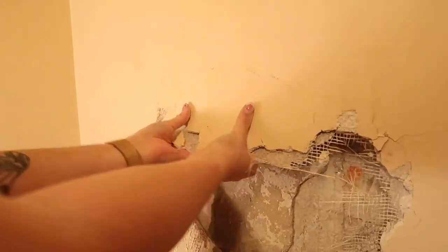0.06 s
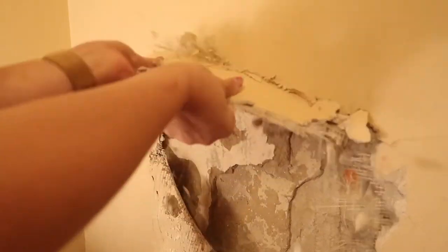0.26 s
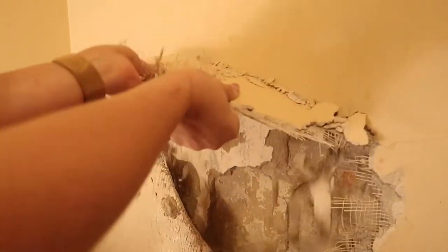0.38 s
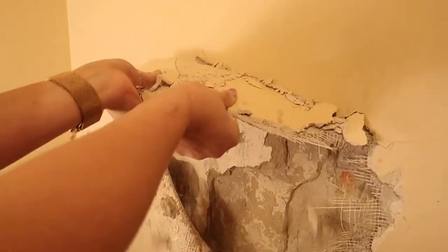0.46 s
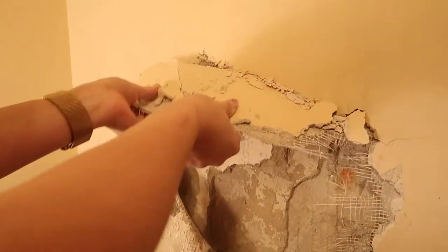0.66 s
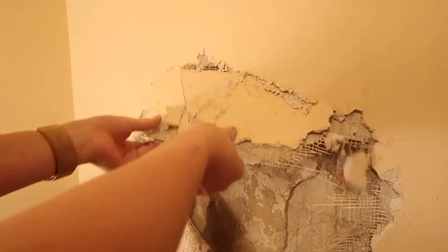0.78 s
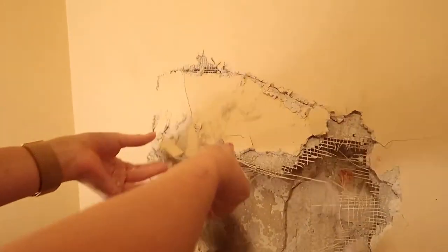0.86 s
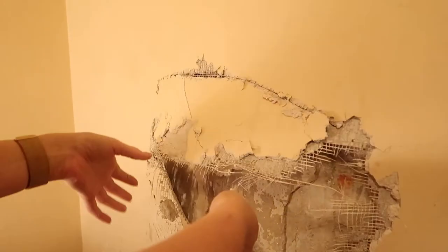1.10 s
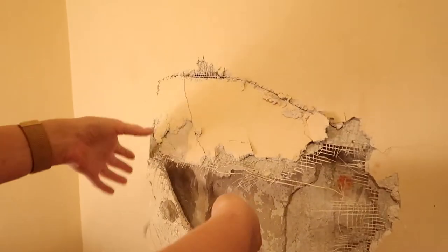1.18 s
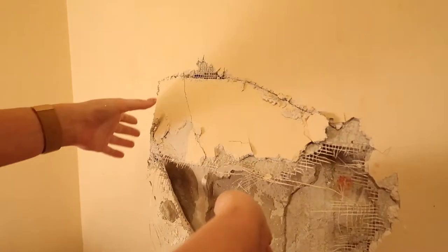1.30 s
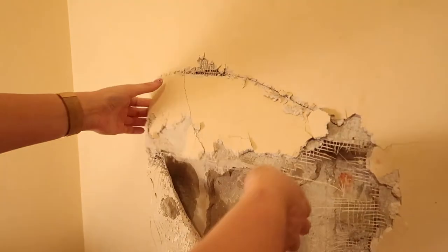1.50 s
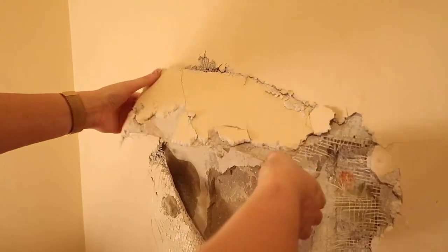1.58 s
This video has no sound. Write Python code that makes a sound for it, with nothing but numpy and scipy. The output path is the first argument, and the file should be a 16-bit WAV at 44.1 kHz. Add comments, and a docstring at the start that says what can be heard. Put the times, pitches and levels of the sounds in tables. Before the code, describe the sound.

A plaster slab tears from a wall with a sudden, crunching crackle. Afterwards grit runs down, small chips tick and larger pieces knock against wall and floor, with short echoes in a small, bare room.

```python
"""Faint grit and a soft bump, then a quick run of snaps: hands prise a slab of plaster off a wall.
The slab tears in many tiny cracks, and each big snap makes it ring briefly. Then grit runs down
the wall, crumbs patter, chips tick and chunks knock on the floor. The room is small and bare,
so the nearby walls answer each chip and chunk."""
import sys
import numpy as np
from scipy import signal
from scipy.io import wavfile
from scipy.ndimage import uniform_filter1d

SR = 44100
rng = np.random.default_rng(int(sys.argv[2]) if len(sys.argv) > 2 else 0)


def output_pcm(signal):
    """Save a mono or channel-first signal as 16-bit PCM at the path in sys.argv[1].

    Samples are clipped to [-1, 1] before scaling.
    """
    pcm = np.clip(np.atleast_2d(signal).T, -1, 1) * 32767
    wavfile.write(sys.argv[1], SR, np.round(pcm).astype(np.int16))


N = 72765
T = np.arange(N) / SR


def amp(db):
    """Turns decibels into a number to multiply by."""
    return 10 ** (np.asarray(db) / 20)


def unit(x):
    """Scales a sound to an average strength (rms) of 1."""
    return x / np.sqrt(np.mean(x ** 2) + 1e-20)


def read(points, hz):
    """Looks up frequencies in a table, blending between rows on a pitch scale."""
    row_hz, value = np.transpose(points)
    return np.interp(np.log(hz + 1), np.log(row_hz + 1), value)


def level(points):
    """Draws a volume curve through (time [s], level [dB]) points."""
    return amp(np.interp(T, *np.transpose(points)))


def add(mix, start_s, sound):
    """Mixes a sound in at the given time."""
    part = mix[max(round(start_s * SR), 0):][:len(sound)]
    part += sound[:len(part)]


def colour(x, points, keep_power=True, size=4096):
    """Shapes bass and treble from a table; keep_power leaves plain noise as strong as it was."""
    log_gain = np.log(amp(read(points, abs(np.fft.fftfreq(size, 1 / SR)))))
    spectrum = np.exp(np.conj(signal.hilbert(log_gain)))  # nothing sounds ahead of a click
    taps = np.fft.ifft(spectrum).real[:size // 2]
    return signal.fftconvolve(x, taps / (np.linalg.norm(taps) if keep_power else 1))[:len(x)]


def clicks(per_s, spread_db):
    """Random clicks: a few stand out if spread_db is positive, a few are weaker if it is negative."""
    strength = amp(spread_db * np.minimum(rng.exponential(1, N), 4))
    return unit(strength * rng.choice([-1., 1.], N) * (rng.random(N) < per_s / SR))


def burst(t, fall_s, rise_s=.001):
    """A volume curve that jumps up to 1 and dies away."""
    shape = (1 - np.exp(-(t / rise_s) ** 2)) * np.exp(-t / fall_s)
    return shape / shape.max()


def ringing(tones):
    """Tones that start together and die away."""
    t = T[:SR // 2]
    return sum(amp(db - 60 * t / fade_s) * np.sin(2 * np.pi * hz * t) for hz, db, fade_s in tones)


# tone of the quiet room (frequency [Hz], relative level [dB])
HUSH_COLOUR = [(20, -11.5), (145, 2), (220, -2.5), (900, -11), (15000, -44)]
def hush(level_db=-53):
    """The faint, steady background of the room."""
    return amp(level_db) * unit(colour(rng.standard_normal(N), HUSH_COLOUR))


# how long the room rings (frequency [Hz], time to fade by 60 dB [s])
ROOM_FADE = [(150, 0.1), (2000, 0.38), (14000, 0.25)]
def room(x, echoes=(), tail_db=-10.5, build_s=.0076):
    """Sound arrives directly, then as any given echoes and a short blur of bounces off the walls."""
    hz, t, noise = signal.stft(rng.standard_normal(SR // 2), SR, nperseg=256)
    fade = amp(-60 * t / read(ROOM_FADE, hz)[:, None])
    tail = signal.istft(noise * fade, SR, nperseg=256)[1]
    tail *= np.minimum(T[:len(tail)] / build_s, 1)
    response = amp(tail_db) * tail / np.linalg.norm(tail)
    response[0] += 1  # the direct sound
    for delay_s, db in echoes:
        add(response, delay_s, amp([db]))
    return signal.fftconvolve(x, response)[:N]


# tone of plaster dust (frequency [Hz], relative level [dB])
DUST_COLOUR = [(1200, -5), (4500, 0.5), (11000, -16), (15500, -26)]
def dust(noise):
    """Gives noise the bright hiss of fine dust."""
    return colour(noise, DUST_COLOUR)


def tick(hz, fall_s, wobble=.65, dust_db=-12.5, size=1000):
    """A small hard piece lands: one short, unsteady ring with a gritty edge."""
    turns = np.cumsum(hz * (1 + wobble * rng.standard_normal(size))) / SR
    ring = np.sin(2 * np.pi * (turns + rng.random()))
    edge = amp(dust_db) * dust(rng.standard_normal(size))
    return np.exp(-T[:size] / fall_s) * (ring + edge)


# flow of grit down the wall (time [s], level [dB])
GRIT_FLOW = [(0, -56.5), (.075, -54), (.11, -66.5), (.42, -55.5), (.6, -47.5), (.618, -36.5), (.69, -43),
             (.72, -42.5), (.98, -46.5), (1.13, -55.5), (1.28, -45.5), (1.42, -41.5), (1.57, -46.5),
             (1.62, -56)]
# tone of the grit (frequency [Hz], relative level [dB])
GRIT_COLOUR = [(200, -18.5), (700, -1.5), (4500, -1), (8000, -8.5), (12500, -13.5), (15500, -56)]
def grit(clump_s=.014, clump_db=2.5):
    """Tiny grains click down the wall in uneven clumps."""
    grains = clicks(per_s=2200, spread_db=-4.5)
    wander = unit(uniform_filter1d(rng.standard_normal(N), round(clump_s * SR)))
    clumps = unit(amp(clump_db * wander))
    return colour(grains * level(GRIT_FLOW) * clumps, GRIT_COLOUR)


def flakes(per_s=220, low_hz=1590, high_hz=6320, pitches=24, against_grit_db=-7):
    """Small flakes tick, each at its own pitch, coming and going with the flow of grit."""
    ticks = np.zeros(N)
    for hz in np.geomspace(low_hz, high_hz, pitches):
        landings = clicks(per_s / pitches, spread_db=2.5)
        ticks += signal.fftconvolve(landings, tick(hz, fall_s=.001))[:N]
    return amp(against_grit_db) * level(GRIT_FLOW) * unit(ticks)


# flow of crumbs onto the floor (time [s], level [dB])
CRUMB_FLOW = [(0, -49), (.15, -57.5), (.58, -46), (.72, -37.5), (.95, -37.5), (1.21, -48), (1.52, -45.5),
              (1.65, -64)]
# tone of the crumbs (frequency [Hz], relative level [dB])
CRUMB_COLOUR = [(100, -20.5), (400, -0.5), (750, -2), (1700, -14.5), (12000, -56)]
def crumbs():
    """Crumbs land on the floor in a dull patter."""
    return colour(clicks(per_s=1100, spread_db=2.5) * level(CRUMB_FLOW), CRUMB_COLOUR)


# chips landing (time [s], pitch [Hz], level [dB])
CHIP_LANDINGS = [(0.865, 3480, -32.5), (.9658, 4930, -35.5), (1.1782, 5600, -35.5), (1.2213, 4325, -28.5),
                 (1.377, 2080, -21), (1.4558, 3720, -26)]
def chips():
    """Hard chips hit the floor with one tick each."""
    ticks = np.zeros(N)
    for start_s, hz, db in CHIP_LANDINGS:
        add(ticks, start_s, amp(db) * tick(hz, fall_s=.0038))
    return ticks


# tone of crunching plaster edges (frequency [Hz], relative level [dB])
CRUNCH_COLOUR = [(170, -33), (450, 7.5), (900, 9.5), (3200, -4.5), (6000, -32.5)]
def blows(rows, thud_rise_s=.0009, thud_cycles=2.3, size=3000):
    """Each snap or knock is a short dead thud, a crunch of the edges and a spit of dust."""
    t = T[:size]
    thuds, crunches, spits = np.zeros((3, N))
    for start_s, hz, thud_db, crunch_db, dust_db in rows:
        crunch_noise, dust_noise = rng.standard_normal((2, size))
        swell = (1 - np.exp(-(t / thud_rise_s) ** 2)) * np.exp(-(hz * t / thud_cycles) ** 2)
        thud = np.gradient(-swell * np.cos(2 * np.pi * hz * t), t) / (2 * np.pi * hz)
        add(thuds, start_s, amp(thud_db) * thud)
        add(crunches, start_s, amp(crunch_db) * burst(t, fall_s=.0047) * crunch_noise)
        add(spits, start_s, amp(dust_db) * burst(t, fall_s=.0069) * dust_noise)
    return thuds + colour(crunches, CRUNCH_COLOUR) + dust(spits)


# a faint low handling bump near the start, and chunks hitting wall and floor
# (time [s], pitch [Hz], thud [dB], crunch [dB], dust [dB])
KNOCKS = [(.028, 860, -41, -40, -65), (.085, 97, -48, -65, -67), (.117, 734, -34.5, -70, -60),
          (.512, 1060, -23, -35.5, -45.5), (.556, 718, -32, -40, -52), (.574, 372, -33, -38.5, -62),
          (.699, 240, -36.5, -43, -43.5), (.738, 692, -9.5, -25.5, -36), (.836, 615, -23, -27.5, -33),
          (.865, 670, -25, -28.5, -45), (.881, 670, -23.5, -35, -60), (.8957, 440, -26.5, -21.5, -42),
          (.8983, 674, -10.5, -30.5, -44), (1.062, 389, -23, -31.5, -55), (1.1435, 346, -27, -28.5, -39),
          (1.2202, 480, -53, -33.5, -40), (1.2415, 525, -13.5, -32, -37.5), (1.251, 538, -14.5, -26, -37),
          (1.2518, 940, -19.5, -26, -35), (1.274, 744, -22, -31, -41), (1.327, 630, -41, -36, -39),
          (1.3765, 533, -14, -27, -40), (1.401, 570, -24.5, -30, -33.5), (1.4555, 526, -25, -27, -27.5),
          (1.551, 815, -27, -37.5, -40)]
# low tones of the small room (pitch [Hz], relative level [dB], time to fade by 60 dB [s])
ROOM_TONES = [(416, -3.5, 0.2), (519.3, -3.5, 0.15), (846, 1.5, .22)]
def knocks(ring_db=-26):
    """A faint handling bump and the knocks of loose chunks; the room rings briefly after each."""
    hits = blows(KNOCKS)
    ring = ringing(ROOM_TONES)
    return hits + amp(ring_db) * signal.fftconvolve(hits, ring / np.linalg.norm(ring))[:N]


# echoes off the nearby walls (delay [s], level against the direct sound [dB])
WALL_ECHOES = [(.0100, -9), (0.02, -17.5)]
def debris():
    """The falling plaster, heard in the room; only knocks and chips get separate echoes."""
    return room(grit() + crumbs() + flakes()) + room(knocks() + chips(), WALL_ECHOES)


# strength of the tearing (time [s], level [dB])
TEAR_LEVEL = [(.198, -60), (.214, -43), (.223, -20.5), (.232, -15.5), (.242, -23), (.256, -19),
              (.277, -19.5), (.308, -23), (.336, -28.5), (.385, -46)]
# tone of the tearing (frequency [Hz], relative level [dB])
TEAR_COLOUR = [(30, -51), (90, -5), (155, -21), (280, -7.5), (480, 1), (620, -2.5), (1400, -11), (1700, -8),
               (2400, -13), (12500, -26), (15500, -56)]
def tearing():
    """The plaster lets go of the wall in a dense run of tiny cracks."""
    cracks = clicks(per_s=3000, spread_db=3) * level(TEAR_LEVEL)
    while_tearing = (T > TEAR_LEVEL[0][0]) & (T < TEAR_LEVEL[-1][0])
    return colour(cracks * while_tearing, TEAR_COLOUR)


# snaps of the breaking slab (time [s], pitch [Hz], thud [dB], crunch [dB], dust [dB])
SLAB_SNAPS = [(0.2179, 690, -19, -15, -30), (0.2266, 474, -4, -20, -29), (0.2278, 1127, -6, -10.5, -17.5),
              (.247, 500, -9, -12, -37), (.2525, 532, -14.5, -18.5, -22), (.2605, 488, -6, -16.5, -33),
              (.2845, 840, -21, -28, -24), (.295, 515, -19.5, -15.5, -22), (.3055, 760, -9, -17.5, -22),
              (.313, 640, -19.5, -29, -45), (0.3298, 770, -18.5, -19, -34.5)]
# tones of the slab (pitch [Hz], level against the thud [dB], time to fade by 60 dB [s])
SLAB_TONES = [(217.3, -19.5, 0.24), (477, -36, 0.099), (832, -19, 0.26), (1693, -15.5, 0.062)]
def slab():
    """The slab tears and snaps loose; every snap sets it ringing briefly."""
    breaking = tearing() + blows(SLAB_SNAPS)
    ring = ringing(SLAB_TONES)
    for start_s, _, thud_db, _, _ in SLAB_SNAPS:
        add(breaking, start_s, amp(thud_db) * ring)
    return breaking


# how wide the sound spreads (frequency [Hz], side level against the middle [dB])
STEREO_WIDTH = [(300, -32), (1000, -20), (2000, -14.5), (4000, -7), (8000, 2)]
def scene(slab_side_db=-3.5, hush_side_db=-18):
    """Bass reaches both ears alike and treble spreads wide; the slab is more central than the debris."""
    middle = room(slab()) + debris() + hush()
    scattered = amp(slab_side_db) * room(slab()) + debris()  # fresh randomness sets the ears apart
    side = colour(scattered, STEREO_WIDTH, keep_power=False) + amp(hush_side_db) * hush()
    return np.array([middle + side, middle - side])


def record(dry, ceiling=.92, cutoff_hz=15700):
    """Rounds off the loudest peaks, then removes the very highest treble."""
    rounded = dry / (1 + (dry / ceiling) ** 6) ** (1 / 6)
    treble_cut = signal.firwin(511, cutoff_hz, window=("kaiser", 9), fs=SR)
    return signal.oaconvolve(rounded, treble_cut[None], "same")


dry = scene()
out = record(dry)
output_pcm(out)
```